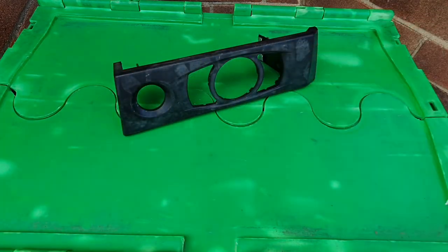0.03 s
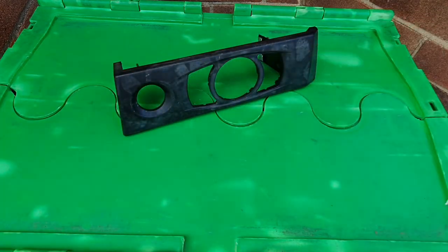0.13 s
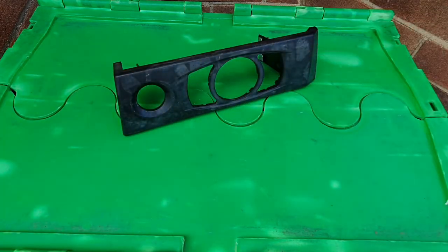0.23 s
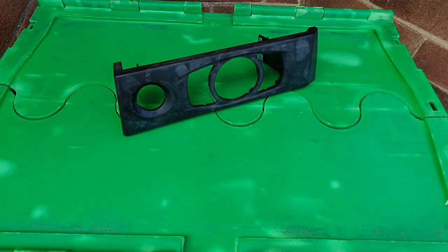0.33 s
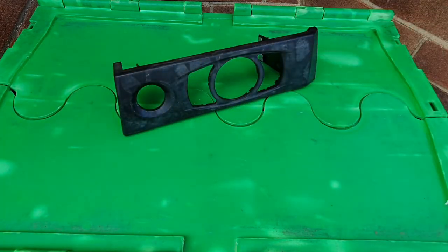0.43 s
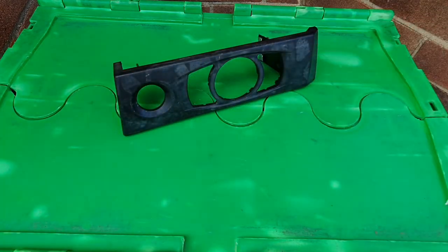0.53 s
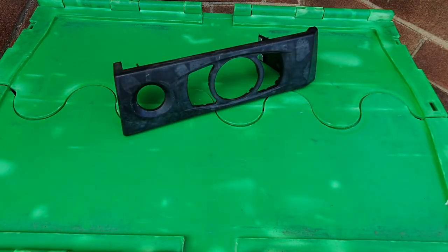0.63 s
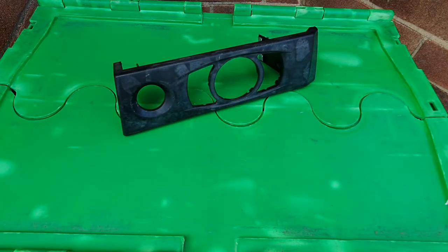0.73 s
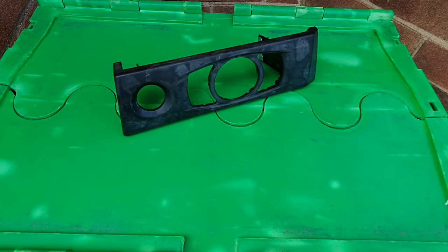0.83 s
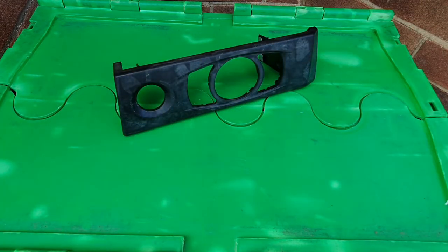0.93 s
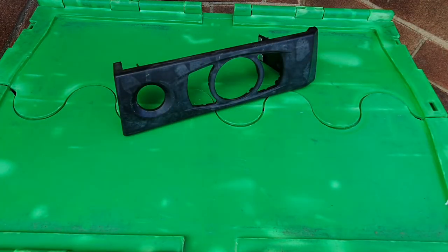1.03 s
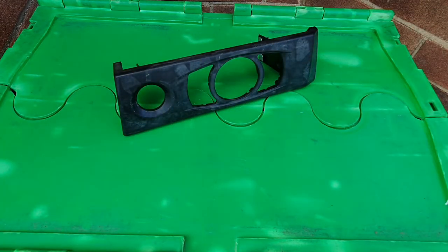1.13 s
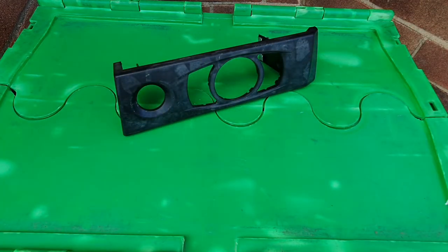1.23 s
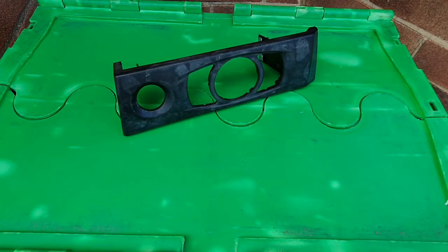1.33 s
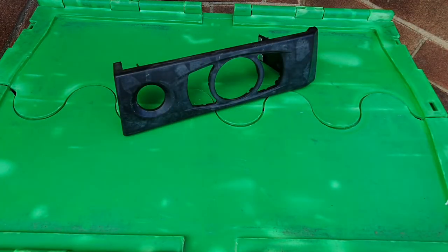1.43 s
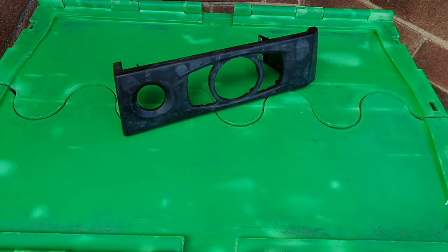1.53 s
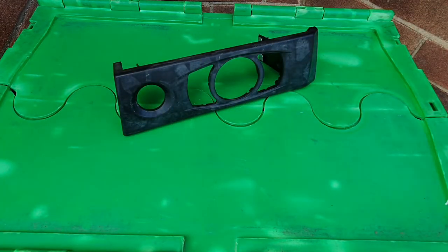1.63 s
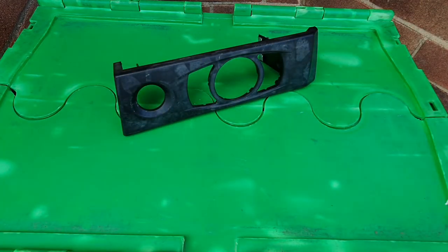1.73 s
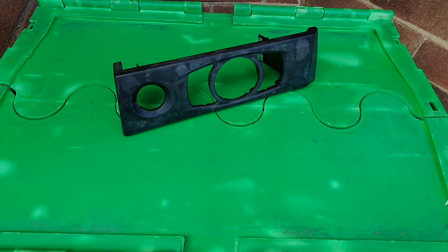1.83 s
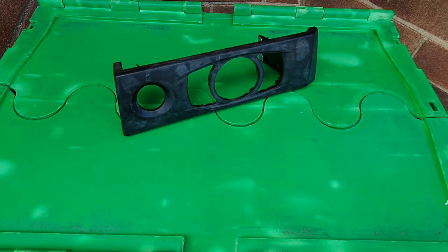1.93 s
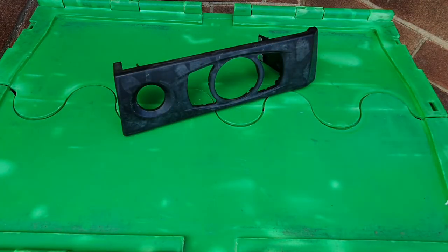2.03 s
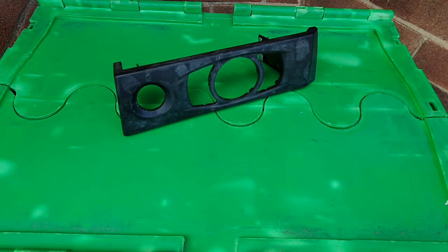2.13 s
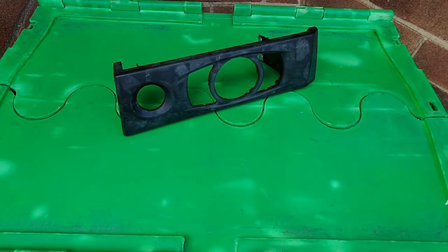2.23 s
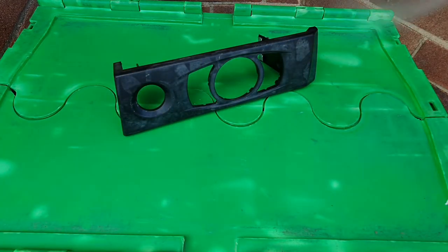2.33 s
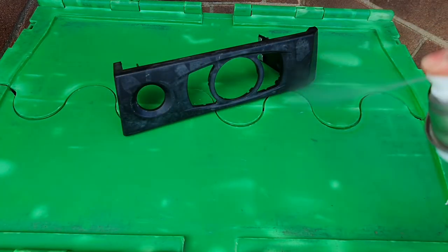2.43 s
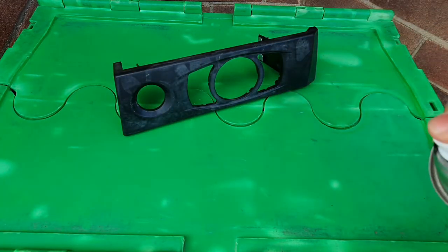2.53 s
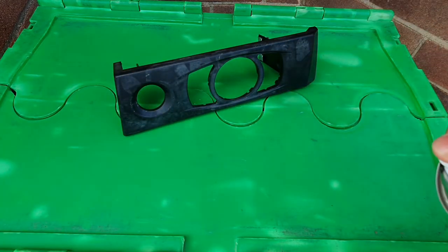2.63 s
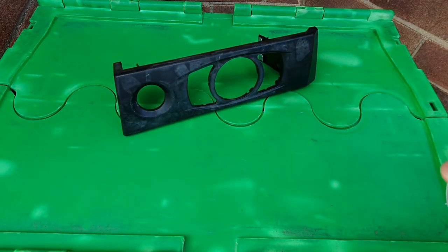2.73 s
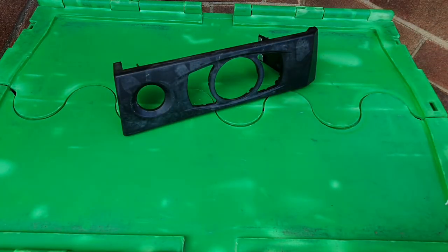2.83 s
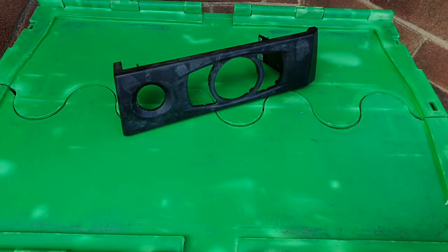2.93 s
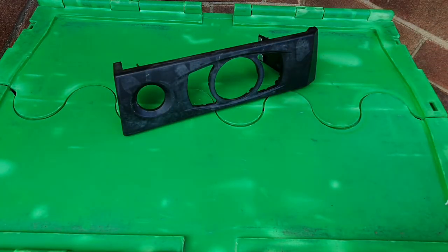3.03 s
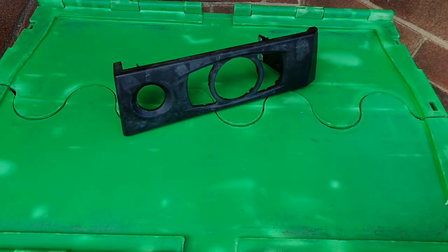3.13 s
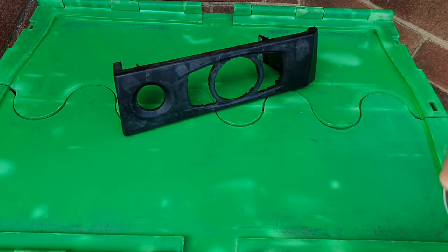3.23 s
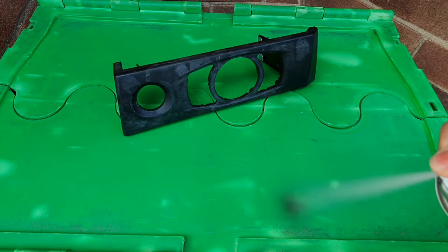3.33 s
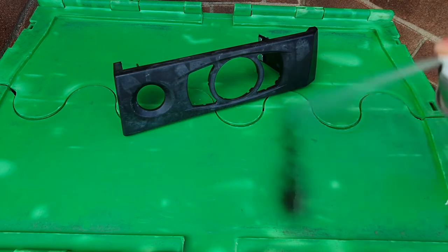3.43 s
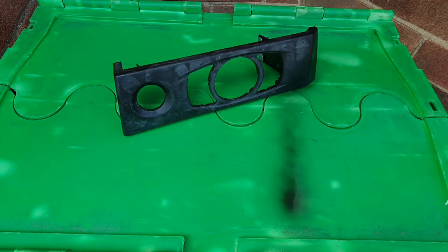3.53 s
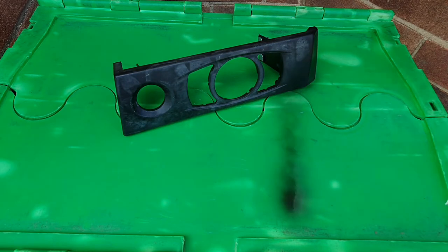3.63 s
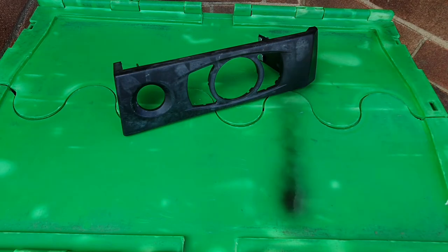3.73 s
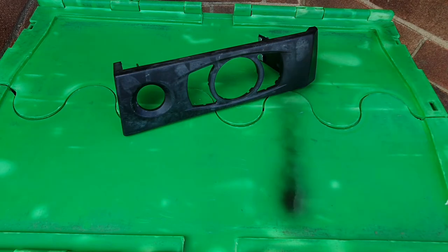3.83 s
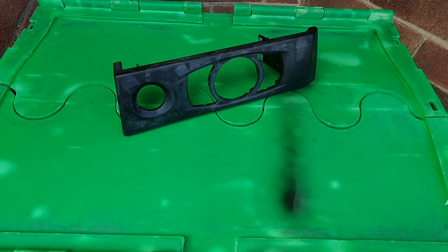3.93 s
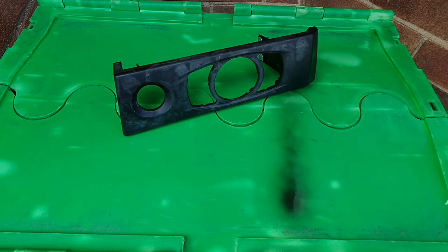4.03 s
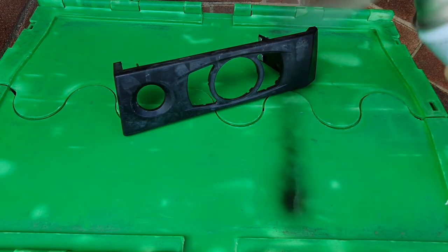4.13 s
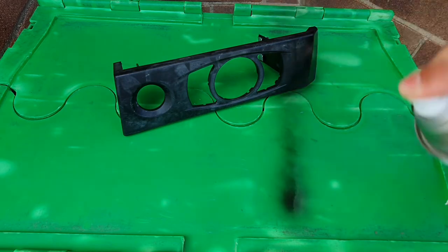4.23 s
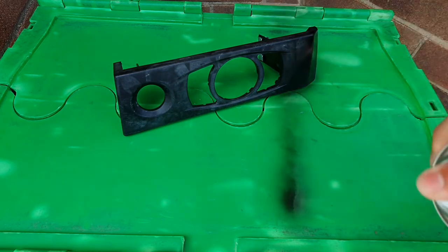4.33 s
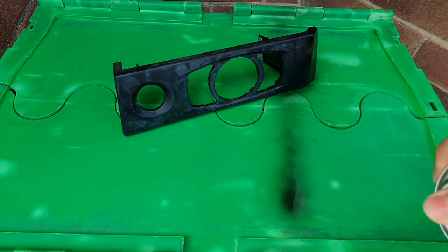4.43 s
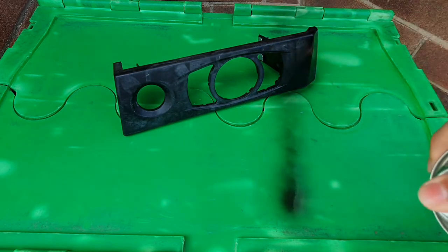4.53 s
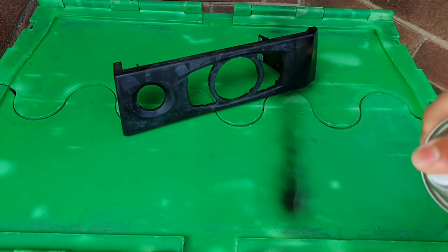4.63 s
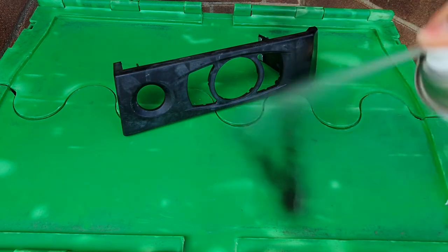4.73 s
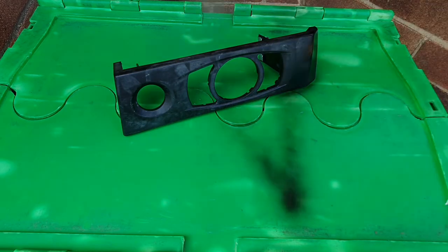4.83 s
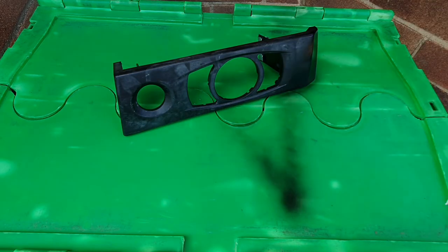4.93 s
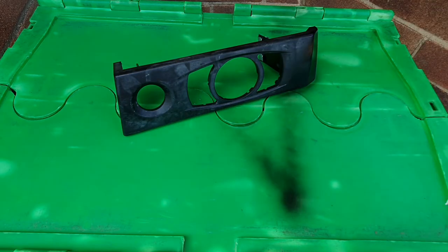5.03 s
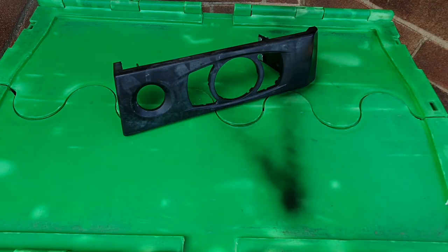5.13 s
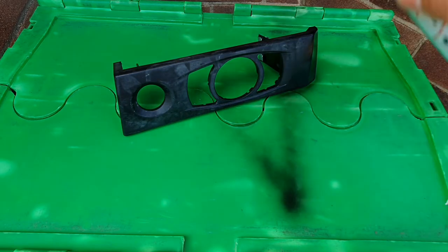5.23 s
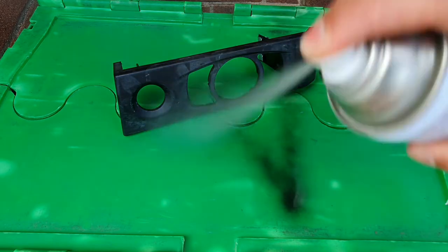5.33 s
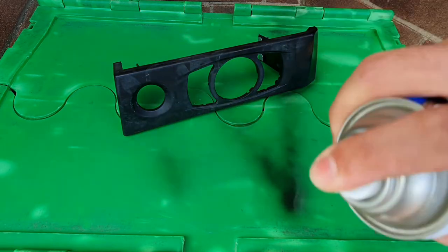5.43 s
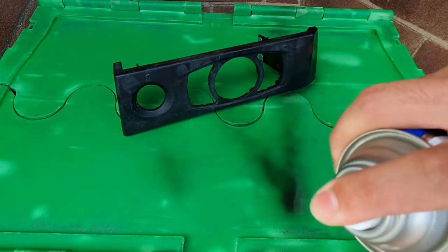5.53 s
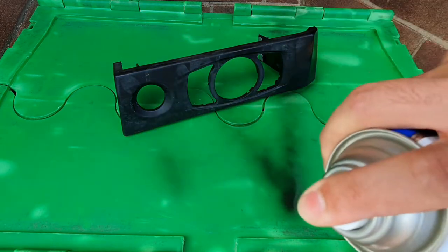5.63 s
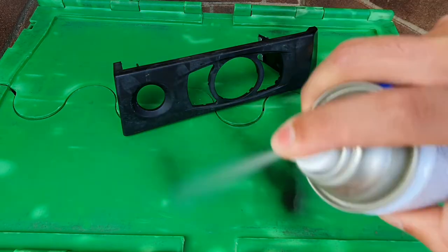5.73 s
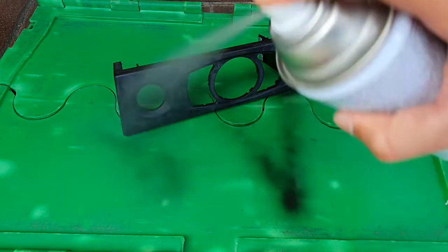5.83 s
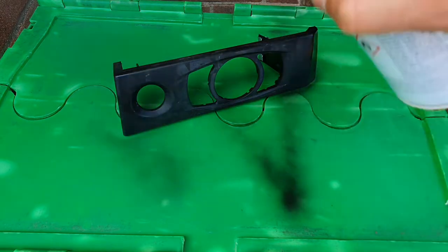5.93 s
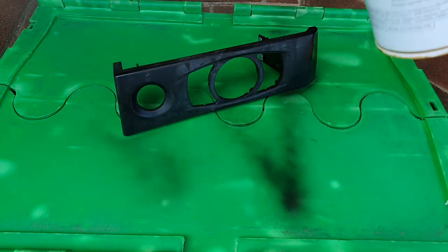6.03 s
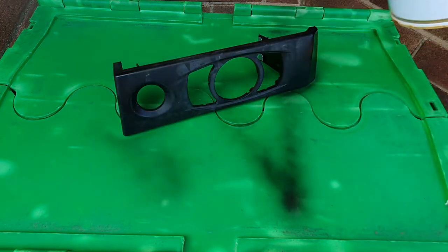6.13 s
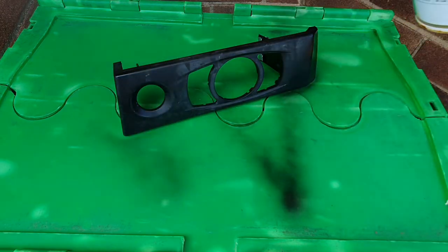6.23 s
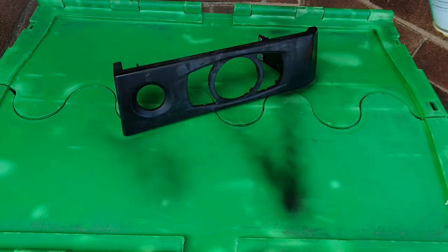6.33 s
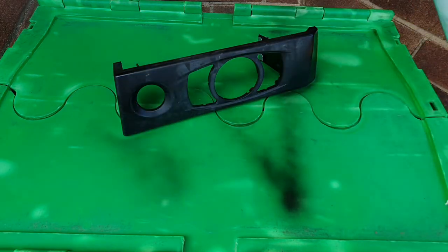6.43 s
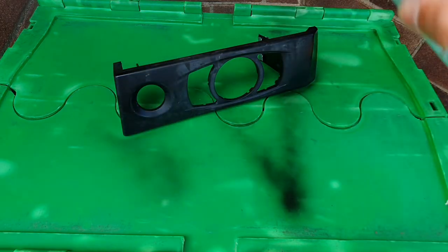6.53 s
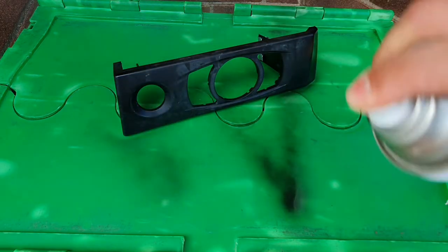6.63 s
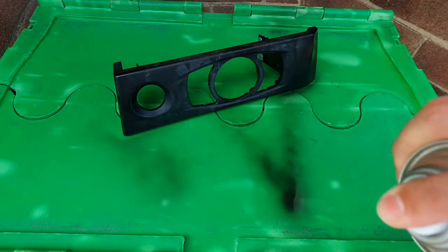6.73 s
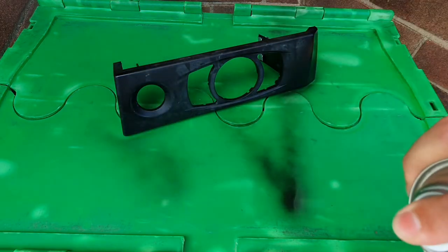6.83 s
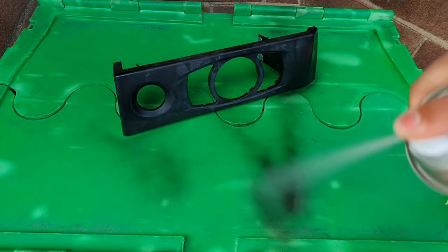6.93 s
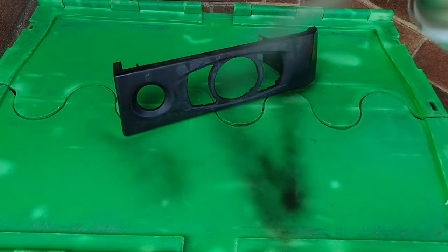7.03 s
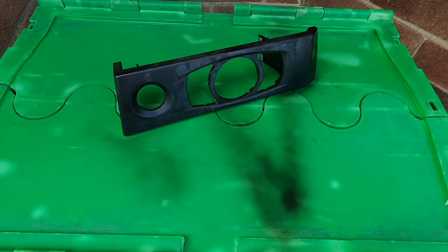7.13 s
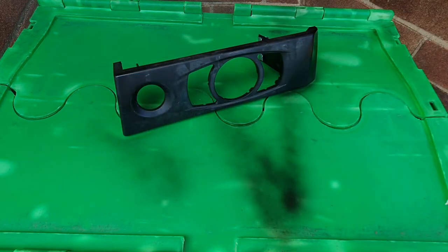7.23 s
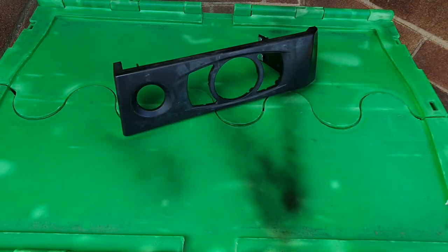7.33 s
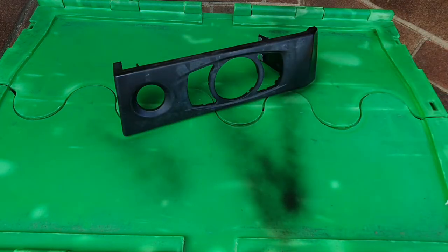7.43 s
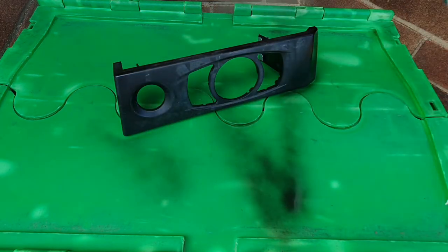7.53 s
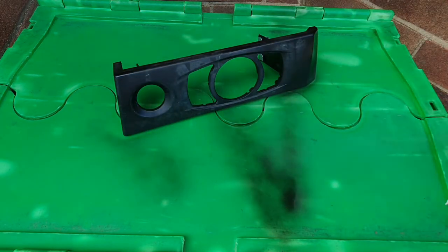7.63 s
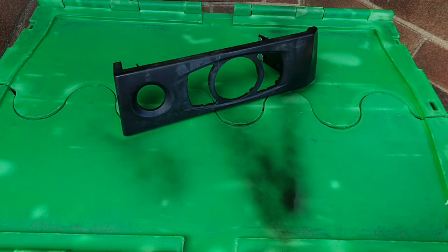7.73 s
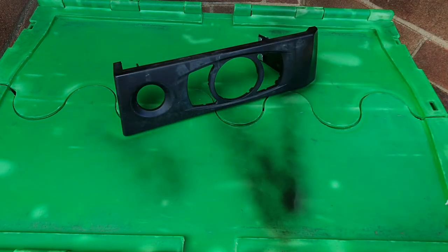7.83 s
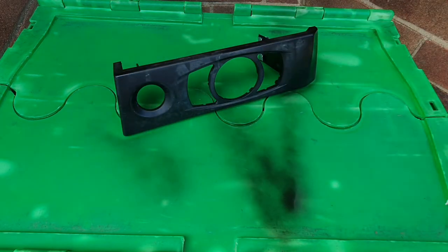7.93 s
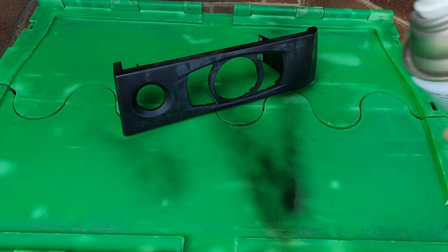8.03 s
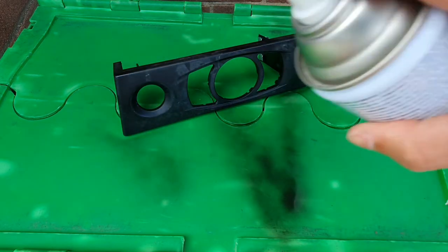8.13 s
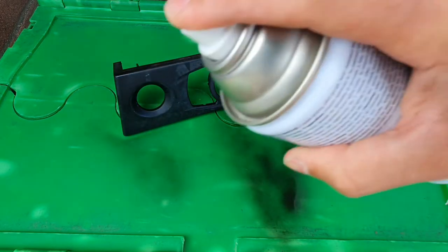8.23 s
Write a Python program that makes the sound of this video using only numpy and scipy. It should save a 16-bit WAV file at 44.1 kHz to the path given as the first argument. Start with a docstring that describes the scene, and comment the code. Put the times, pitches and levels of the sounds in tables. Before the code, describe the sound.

A mixing ball clatters inside an aerosol can, followed by short, evenly paced sprays, with road traffic rumbling behind.

```python
"""Outdoors by a brick wall, a paint can is shaken, then nine short bursts are sprayed over a plastic lid.
The mixing ball knocks on the can's base and rings its thin wall, while the hand rustles on the metal.
Each press of the nozzle lets out a hissing jet that splashes on the lid. Cars pass on a nearby road,
slow engines drone underneath, and the distant town is a soft wash of noise.
A phone stands close by and listens through two microphone openings, the left and right "ports"."""
import sys
import numpy as np
from scipy import signal
from scipy.fft import rfft, irfft
from scipy.io import wavfile
from scipy.ndimage import map_coordinates

SR = 44100
rng = np.random.default_rng(int(sys.argv[2]) if len(sys.argv) > 2 else 0)


def materialize(psi):
    """Save the field psi as 16-bit PCM at rate SR to the path in sys.argv[1].

    A 1-D psi becomes a single channel; in a 2-D psi each row is a channel.
    """
    bounded = np.clip(np.atleast_2d(psi).T, -1, 1)
    quanta = np.round(bounded * 32767).astype(np.int16)
    wavfile.write(sys.argv[1], SR, quanta)


N = 365148
TIME = np.arange(N) / SR
FREQ = np.fft.rfftfreq(N, 1 / SR) + 1e-3


def undb(db):
    """Turn decibels into a gain to multiply by."""
    return 10 ** (np.asarray(db) / 20)


def over_time(rows):
    """Join the points of a time table with lines: one curve for each column after the time."""
    time_s, *columns = np.transpose(rows)
    return [np.interp(TIME, time_s, column) for column in columns]


def over_hz(rows, freq=FREQ, column=1):
    """Join the points of one column of a frequency table, with octaves evenly spaced."""
    rows = np.array(rows)
    return np.interp(np.log(np.maximum(freq, 1)), np.log(rows[:, 0]), rows[:, column])


def shape(x, gain):
    """Filter a sound with one gain for each frequency."""
    return irfft(rfft(x) * gain, N)


def band_level(x, band_hz):
    """Typical size (rms) of the channels' average between two frequencies."""
    mono = np.atleast_2d(x).mean(axis=0)
    return np.std(shape(mono, (FREQ > band_hz[0]) & (FREQ < band_hz[1])))


def below(hz, order=4):
    """Gains that keep the lows and fade out above hz."""
    return 1 / (1 + (FREQ / hz) ** order)


def short_response(rows, size=512):
    """A click coloured by (freq_hz, level_db) points, its energy as early as can be (minimum phase)."""
    cepstrum = irfft(np.log(undb(over_hz(rows, np.fft.rfftfreq(size, 1 / SR)))))
    cepstrum[1:size // 2] *= 2
    cepstrum[size // 2 + 1:] = 0
    return irfft(np.exp(rfft(cepstrum)))


def ring(x, response):
    """Play a sound through something, given how that thing answers a click."""
    return signal.oaconvolve(x, response)[:len(x)]


def fade(t, t60):
    """Die away by 60 dB every t60 seconds."""
    return np.exp(-np.log(1000) * t / t60)


def unit(x):
    """Scale a sound to an energy of 1."""
    return x / np.sqrt(np.sum(x ** 2))


def wander(rate_hz):
    """A smooth random curve of typical size 1, moving about rate_hz times a second."""
    coarse_s = TIME[::50]
    hz = np.fft.rfftfreq(len(coarse_s), coarse_s[1])
    spectrum = rfft(rng.standard_normal(len(coarse_s)))
    curve = irfft(spectrum / (1 + (hz / rate_hz) ** 4), len(coarse_s))
    return np.interp(TIME, coarse_s, curve / curve.std())


def pan(left_minus_right_db):
    """Left and right gains that place a sound to one side."""
    return undb(np.vstack([left_minus_right_db, -left_minus_right_db]) / 2)


def echoes(x, db, t60):
    """Nearby surfaces add a dense, fading train of echoes."""
    t = TIME[:SR // 2]
    tail = unit(rng.standard_normal(len(t)) * fade(t, t60))
    return (x + undb(db) * ring(x, tail)) / np.hypot(1, undb(db))


def to_ports(left, right, wall_db, wall_t60, yard_db, yard_t60):
    """Both ports hear the near wall and the yard's faint echo; the right one is shaded from the can."""
    # the right port compared with the left, with a deep notch: freq_hz, gain_db
    right_shade = [(500, -1), (1300, -6.5), (2400, -4.5), (4400, -9.5), (6800, -13), (7500, -6),
                   (7900, -30), (8400, -14), (9300, 1.5), (15000, -3.5)]
    left, right = (echoes(echoes(x, wall_db, wall_t60), yard_db, yard_t60) for x in (left, right))
    return np.array([left, ring(right, short_response(right_shade))])


def far_noise(gain):
    """Noise from the road: alike at both ports in the bass, less alike and mostly on the left above."""
    # the road at the two ports: freq_hz, likeness (0 to 1), left_minus_right_db
    road_stereo = [(60, 1, -6), (119, 0.97, 8), (323, 0.87, 4), (666, 0.4, 6.5), (1404, 0, 8),
                   (4750, 0, 15.5), (8700, 0.37, 15), (15000, 0.3, -11)]
    likeness = np.clip(over_hz(road_stereo), 0, 1)
    mid, side = rfft(rng.standard_normal((2, N))) * np.sqrt([1 + likeness, 1 - likeness]) * gain
    return irfft(np.array([mid + side, mid - side]) * pan(over_hz(road_stereo, column=2)), N)


def yard_colour(rows):
    """Gains for a (freq_hz, level_db) table, raised at the pitches where the yard rings."""
    # the yard's resonances: pitch_hz, width_hz, boost_db
    resonances = [(295.8, 18, 4.5), (343, 18, 0.5), (430, 33, 3), (530, 180, 0), (659.3, 39, 8.5),
                  (837, 11, 3), (965, 49, 3.5), (1443.5, 200, -0.5), (1645, 57, 4.5)]
    boost_db = sum(db / (1 + (2 * (FREQ - hz) / width) ** 2) for hz, width, db in resonances)
    return undb(over_hz(rows) + boost_db)


def town(level_db=-51, swell_db=2.0):
    """Distant traffic blends into a soft wash that slowly swells and sinks."""
    # tone colour of the town: freq_hz, level_db
    town_colour = [(100, -6.5), (200, -2.5), (400, -11), (500, -10.5), (1000, -9), (2000, -14.5),
                   (3200, -25.5), (5000, -35.5), (6900, -37.5), (7500, -51.5), (10000, -44), (12000, -55),
                   (15000, -72.5)]
    wash = far_noise(yard_colour(town_colour))
    return wash / band_level(wash, (500, 1300)) * undb(level_db + swell_db * wander(0.27))


def passing(nearest_s, near_s, falloff=1.45):
    """Gain of something going by in a straight line: 1 at its nearest, fading with distance."""
    return np.hypot(1, (TIME - nearest_s) / near_s) ** -falloff


def engines(drone_db=-2, rumble_db=3.0, wobble_db=0.2, other_hz=60.84, other_at_s=4.9, sag_hz_per_s=0.7):
    """Two exhaust notes beat against each other over an uneven rumble."""
    # how fast a labouring engine fires: time_s, rate_hz
    firing_rate = [(0, 46), (2.5, 46.68), (4.1, 47.03), (4.8, 48.8), (5.6, 48.1), (6.7, 45.56),
                   (8.28, 45.64)]
    # strength of its note and the octave above, before drone_db: time_s, note_db, octave_db
    engine_levels = [(0, -41, -52), (1.2, -43.5, -60), (2.3, -44, -65), (2.6, -35.5, -46.5),
                     (4.5, -28.5, -41.5), (5.05, -28, -30), (5.9, -23, -32), (7.0, -30.5, -29),
                     (7.2, -38, -31), (7.42, -24, -29.5), (7.75, -33, -41), (8.28, -32, -28.5)]
    # strength of the rumble, before rumble_db: time_s, level_db
    rumble_levels = [(0, -39), (1.95, -46), (2.2, -35.5), (3.9, -35.5), (4.07, -31.5), (4.25, -46),
                     (4.7, -35), (8.28, -36.5)]
    # tone colour of the rumble: freq_hz, level_db
    rumble_colour = [(20, -20.5), (32, -13.5), (43, -4.5), (58, -4), (78, 9), (100, 4), (118, -5.5),
                     (140, -17.5), (220, -62.5), (1000, -91)]
    firing_hz = over_time(firing_rate)[0] * (1 + 0.01 * wander(7.1))
    note_db, octave_db = over_time(engine_levels)
    phase = 2 * np.pi * np.cumsum(firing_hz) / SR
    labouring = undb(note_db) * np.sin(phase) + undb(octave_db) * np.sin(2 * phase)
    # the other engine comes and goes, slowing steadily
    slowing_hz = (other_hz - sag_hz_per_s * (TIME - other_at_s)) * (1 + 0.008 * wander(2.9))
    other = undb(-28.5) * passing(other_at_s, near_s=1.18) * np.sin(2 * np.pi * np.cumsum(slowing_hz) / SR)
    drone = np.sqrt(2) * (labouring + other) * undb(drone_db + wobble_db * wander(6.7))
    rumble = far_noise(undb(over_hz(rumble_colour)))
    return drone * pan(1.5) + rumble / rumble.std() * undb(over_time(rumble_levels)[0] + rumble_db)


def cars(flicker_db=1.57, boom_reach=1.1):
    """Tyre roar and road boom swell with each car; the boom carries a little longer round the houses."""
    # passing cars: nearest_s, half_time_in_view_s, roar_db, boom_db
    passes = [(0.3, 0.69, -52.5, -48.5), (3.25, 0.4, -39.5, -35), (5.0, 0.66, -46, -46),
              (6.08, 0.38, -39, -36.5), (8.001, 0.23, -35, -38)]
    # tone colour of the cars in the yard: freq_hz, level_db
    car_colour = [(110, -3), (150, -6.5), (200, -1.5), (250, -0.5), (330, 3), (410, -2), (500, -10.5),
                  (700, -5.5), (1000, -4.5), (1300, -6.5), (1700, -15), (2500, -21.5), (6900, -46.5),
                  (7600, -49.5), (15000, -55.5)]
    colour, low_share = yard_colour(car_colour), below(458, order=8)
    roar = far_noise(colour * np.sqrt(1 - low_share))
    boom = far_noise(colour * np.sqrt(low_share))
    roar_swells = [undb(db) * passing(s, near_s) for s, near_s, db, _ in passes]
    boom_swells = [undb(db) * passing(s, near_s * boom_reach) for s, near_s, _, db in passes]
    roar *= np.linalg.norm(roar_swells, axis=0) / band_level(roar, (500, 1300))
    boom *= np.linalg.norm(boom_swells, axis=0) / band_level(boom, (170, 450))
    return roar * undb(flicker_db * wander(30)) + boom


def rustle(fade_s=0.03, scuff_db=3, low_cut_hz=2500):
    """Skin and sleeve rub unevenly while the can is shaken or turned."""
    # movements of the hand: start_s, length_s, level_db
    moves = [(0.03, 1.64, -65.5), (7.94, 0.22, -68)]
    rub = shape(rng.standard_normal((2, N)), 1 - below(low_cut_hz))
    grip = sum(undb(db) * np.clip(np.minimum(TIME - s, s + length_s + fade_s - TIME) / fade_s, 0, 1)
               for s, length_s, db in moves)
    return rub * grip * undb(scuff_db * wander(25))


def can_hits(wait_s=0.013, bounce_db=-12, spread_db=2):
    """List every hit on the can and the weaker bounce that follows it; the last two are faint clicks from the
    hand."""
    # ball on can, and last two rows faint clicks of the hand on the can: start_s, strength_db, hardness_db (the
    # thin wall's ring over the base's knock)
    strikes = [(0.031, -39.5, 4.5), (0.048, -24.5, -5.5), (0.185, -23, -3), (0.207, -21.5, -12),
               (0.214, -20.5, 6.5), (0.225, -23, 3), (0.27, -24, -3.5), (0.274, -22.5, -3.5),
               (0.3062, -16, -10), (0.325, -18.5, 10.5), (0.3291, -14, 1.5), (0.344, -21, 7),
               (0.354, -27, -2), (0.364, -21, -5), (0.405, -12.5, -2), (0.423, -23, -5),
               (0.4475, -25.5, -3), (0.4654, -19.5, -12), (0.477, -22.5, 22.5), (0.486, -27, 25),
               (0.521, -23.5, 2), (0.534, -25.5, -7), (0.546, -24.5, -2), (0.617, -21.5, 2.5),
               (0.677, -23, -7), (0.7021, -18.5, 15.5), (0.746, -40, -16), (0.758, -24.5, -8),
               (0.809, -30, -3), (0.8143, -22, -7), (0.828, -23.5, 9), (0.870, -24, 0), (0.89, -19, 11.5),
               (0.902, -20, 5), (0.907, -18, 17), (0.9345, -20, 11), (0.954, -24, -2.5), (1.01, -33, -4),
               (1.0183, -26.5, -4), (1.032, -30, -7), (1.061, -26, 0), (1.111, -30, -9), (1.119, -27.5, -7),
               (1.2, -36, -3), (1.2188, -25, 18.5), (1.229, -24, 5), (1.313, -32.5, -3), (1.334, -30.5, 0),
               (1.378, -34.5, -5), (1.425, -42, -2), (1.4473, -33, 1.5), (1.484, -33, 6), (1.5177, -46, -3),
               (1.5488, -37.5, 9), (1.5652, -38.5, 8), (2.595, -55, 2), (6.72, -55, 2), (7.965, -50, 6),
               (8.065, -51, 6)]
    chance = rng.standard_normal((len(strikes), 2))
    bounces = [(s + wait_s * np.exp(0.35 * wait), db + bounce_db + spread_db * loss, hardness_db / 2)
               for (s, db, hardness_db), (wait, loss) in zip(strikes, chance)]
    return list(strikes) + bounces


def strike(shell, knock_db, knock_hz=2250, tone_db=-7, detune=0.011):
    """One hit at both ports: a tick and crack, the can's ringing tones and a knock from its base."""
    # the can's strongest tones, damped by paint and hand: pitch_hz, level_db, ring_time_s
    can_tones = [(1260, -23, 0.097), (1600, 6.5, 0.08), (2140, 8.5, 0.09), (2230, 1, 0.055),
                 (2820, -41, 0.058), (2700, 3, 0.14), (3260, -10.5, 0.063), (3370, -22.5, 0.15),
                 (3440, -7, .06), (4365, 20.5, 0.022), (4980, 3, 0.047), (6470, 8, 0.042)]
    t = TIME[:SR // 6]
    hz, db, t60 = np.transpose(can_tones)[:, :, None]
    hz = hz * (1 + detune * rng.standard_normal(hz.shape))
    tones = undb(db) * np.sin(2 * np.pi * hz * t) * fade(t, t60)
    # where the ball lands decides which tones answer
    tone = undb(tone_db) * unit(rng.standard_normal(len(tones)) @ tones)
    # the pitch of the domed base shifts with the sloshing paint
    shifted_hz = knock_hz * np.exp(0.11 * rng.standard_normal())
    knock = undb(knock_db) * unit(np.sin(2 * np.pi * shifted_hz * t) * fade(t, t60=0.026))
    crack, tick = unit(fade(t, t60=0.051)), undb(-4) * unit(fade(t, t60=0.002))
    contact = np.hypot(crack, tick) * rng.standard_normal(len(t))
    # the shell's noisy ring is different at each port
    shimmer = undb(-2) * unit(fade(t, t60=0.036)) * rng.standard_normal((2, len(t)))
    return np.array([unit(ring(contact + side, shell)) + tone + knock for side in shimmer])


def rattle(body_hz=3200, tick_hz=7500):
    """The ball knocks about: dull hits sound the can's base, hard ones its thin wall and a bright tick."""
    # tone colour of the can's shell: freq_hz, level_db
    shell_colour = [(350, -55), (600, -25), (634, -14.5), (915, -10.5), (1120, -0.5), (1510, -1.5),
                    (2190, -3), (3870, -5.5), (6150, -7), (7640, -15), (9760, -12.5), (13000, -16),
                    (15500, -24)]
    shell = short_response(shell_colour)
    bands = [signal.butter(3, hz, kind, fs=SR, output="sos")
             for hz, kind in [(body_hz, "low"), ([body_hz, tick_hz], "band"), (tick_hz, "high")]]
    sound = np.zeros((2, N + SR))
    for start_s, strength_db, hardness_db in can_hits():
        hit = strike(shell, knock_db=min(-9 - 0.81 * hardness_db, 0))
        start = int(start_s * SR)
        body_db, ring_db, tick_db = -2 - hardness_db / 2, 1 + hardness_db / 2, -9 + hardness_db / 2
        for band, db in zip(bands, (body_db, ring_db, tick_db)):
            part = signal.sosfilt(band, hit)
            attack_level = part[:, :200].std()
            sound[:, start:start + part.shape[1]] += undb(strength_db + db) * part / attack_level
    # the can is held to one side, so the left port hears it a little later
    left, right = np.roll(sound[0, :N], shift=16), sound[1, :N]
    return to_ports(left, right, wall_db=-9.5, wall_t60=0.036, yard_db=-16.5, yard_t60=0.19)


def valve(start_s, held_s, surge_db, attack_s=0.02, surge_s=0.055, release_s=0.03):
    """Flow during one press: the valve opens quickly, the pressure settles, and it closes more slowly."""
    age_s = np.maximum(TIME - start_s, 0)
    opening = np.minimum(age_s / attack_s, 1)
    surge = undb(surge_db * np.exp(-age_s / surge_s))
    closing = np.exp(-(np.maximum(age_s - held_s, 0) / release_s) ** 2)
    return opening * surge * closing


def jet(direct_share=0.79, lid_echo=0.21, lid_s=0.000389, port_lag_s=0.000131):
    """The swirling jet makes noise; its echo off the lid shifts as the hand sweeps."""
    # tone colour of the jet: freq_hz, level_db
    jet_colour = [(500, -4), (1200, -2), (1800, 0.5), (2350, 3), (3200, -1), (4200, -1), (6700, 0.5),
                  (7600, -6), (9500, -4.5), (12000, -5), (15500, -2.5)]
    # the core reaches both ports; spray scattered over lid and wall is unrelated at each
    core, *scatter = shape(rng.standard_normal((3, N)), undb(over_hz(jet_colour)))
    delays_s = port_lag_s * wander(1.44), lid_s * np.exp(0.37 * wander(2.23))
    at_right, off_lid = (map_coordinates(core, [(TIME - s) * SR], order=3) for s in delays_s)
    direct = np.array([core, at_right]) + lid_echo * off_lid
    return np.sqrt(direct_share) * direct + np.sqrt(1 - direct_share) * np.array(scatter)


def spray(spit_db=2, spit_s=0.036, sputter_db=1.07, pan_offset_db=2):
    """Each press lets out a fine hiss, the jet's rush and a splash of paint on the lid, all sputtering."""
    # presses of the nozzle: start_s, held_s, hiss_db, surge_db, rush_over_hiss_db,
    # splash_over_hiss_db, left_minus_right_db (before pan_offset_db is taken off)
    presses = [(2.249, 0.17, -29.5, -4, -3.5, -10, 2.5), (3.304, 0.2, -32.5, 6, -5, -13, 3),
               (4.023, 0.18, -38, 14.5, -6, -9.5, 3.5), (4.66, 0.19, -33.5, 6.5, -4.5, -8, 3),
               (5.214, 0.15, -33, 8.5, -4.5, -10.5, 5), (5.741, 0.2, -33.5, 11, -5.5, -8, 6.5),
               (6.383, 0.19, -32.5, 3.5, -5.5, -10.5, 4.5), (6.884, 0.22, -34, 9, -5.5, -9.5, 4),
               (7.433, 0.18, -35, 7, -4, -10.5, 4)]
    noise = jet()
    splash = shape(noise, below(3440, order=8))
    rush = shape(noise, below(8230, order=10)) - splash
    hiss = noise - rush - splash
    flow = sum(valve(start_s, held_s, surge_db) for start_s, held_s, _, surge_db, *_ in presses)
    # each press keeps its own level, colour and place until the next
    presses = np.array(presses)
    current = np.maximum(np.searchsorted(presses[:, 0], TIME) - 1, 0)
    start_s, _, hiss_db, _, rush_db, splash_db, pan_db = presses[current].T
    # paint left in the nozzle spits out first
    spitting_db = spit_db * np.exp(-np.maximum(TIME - start_s, 0) / spit_s)
    # a weak flow is duller: the rush fades less steeply than the hiss
    layers = [(hiss, (8000, 15500), flow),
              (rush, (3000, 7000), flow ** 0.82 * undb(rush_db + spitting_db / 2)),
              (splash, (1800, 3000), flow * undb(splash_db + spitting_db))]
    sound = sum(part / band_level(part, band_hz) * gain * undb(hiss_db + sputter_db * wander(60))
                for part, band_hz, gain in layers)
    left, right = sound * pan(pan_db - pan_offset_db)
    return to_ports(left, right, wall_db=-7, wall_t60=0.038, yard_db=-29.5, yard_t60=0.49)


def scene():
    """The can close by; the road beyond, echoed by the house wall."""
    road = np.array([echoes(port, db=-9.5, t60=0.24) for port in cars() + town()])
    return rattle() + spray() + road + engines() + rustle()


def record(dry):
    """The phone flattens the sharpest cracks and steeply cuts the treble above 15450 Hz."""
    treble_cut = signal.ellip(12, 0.2, 80, 15450, fs=SR, output="sos")
    return signal.sosfilt(treble_cut, np.clip(dry, -0.85, 0.85))


dry = scene()
out = record(dry)
materialize(out)
```